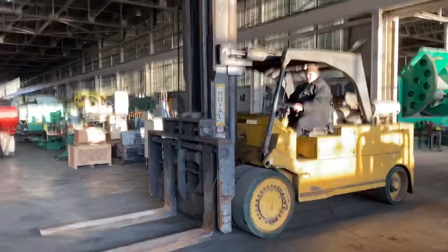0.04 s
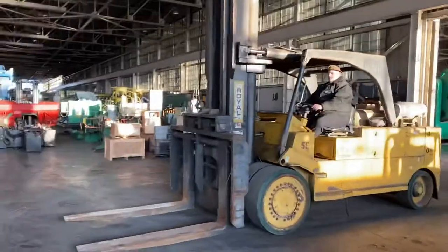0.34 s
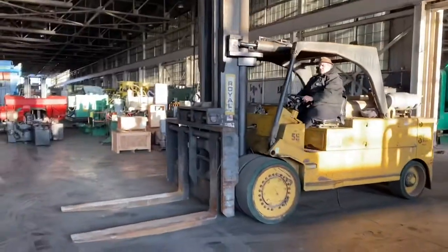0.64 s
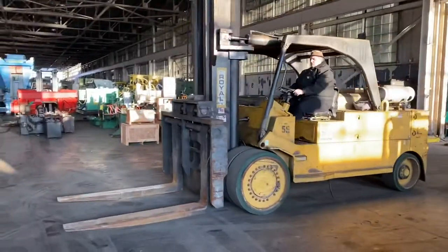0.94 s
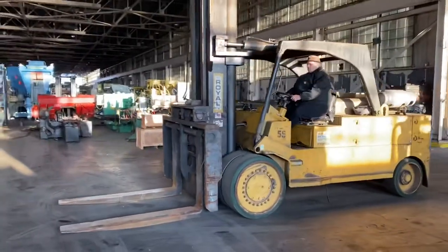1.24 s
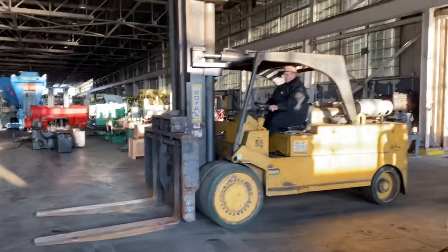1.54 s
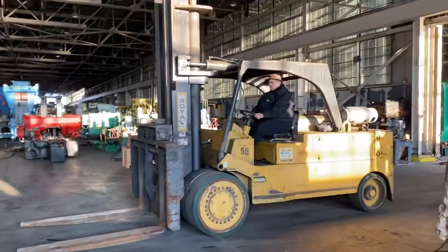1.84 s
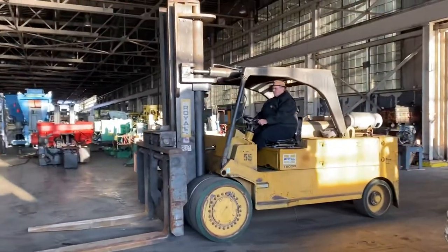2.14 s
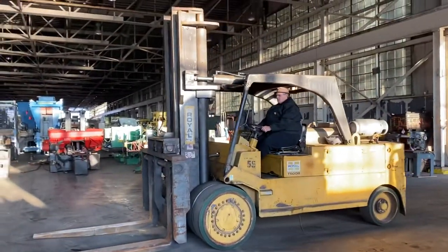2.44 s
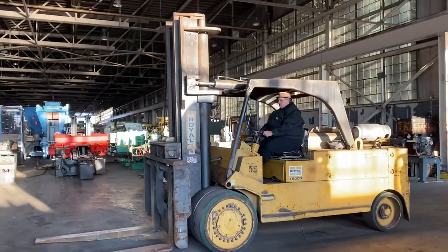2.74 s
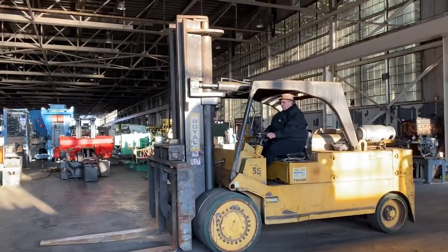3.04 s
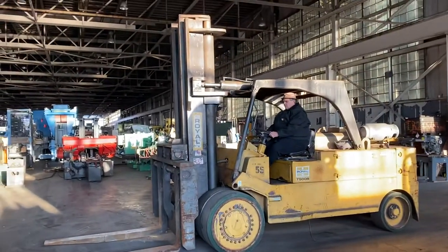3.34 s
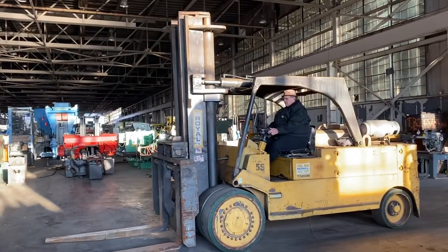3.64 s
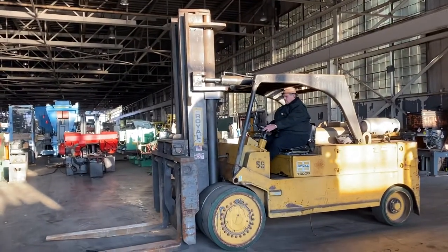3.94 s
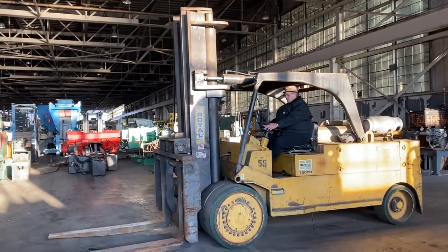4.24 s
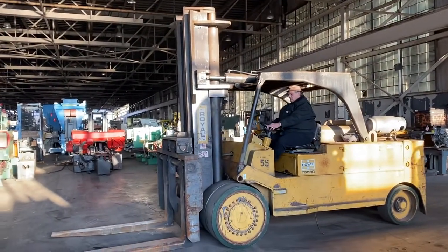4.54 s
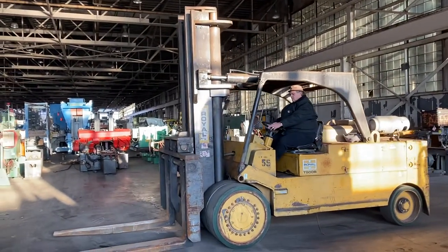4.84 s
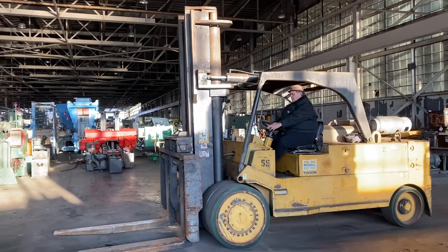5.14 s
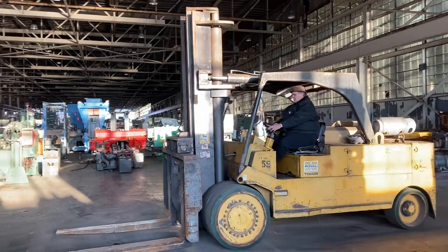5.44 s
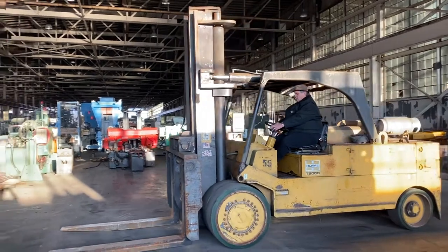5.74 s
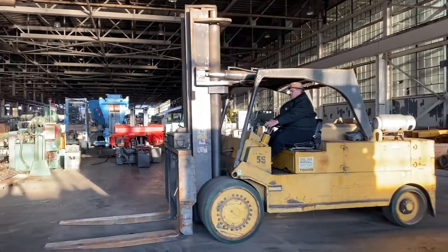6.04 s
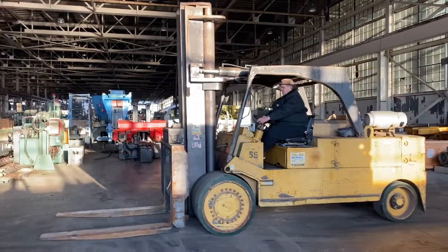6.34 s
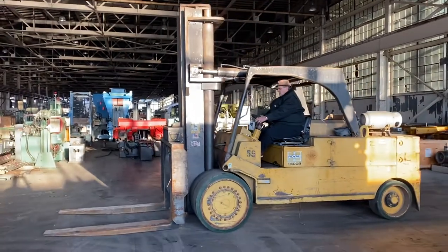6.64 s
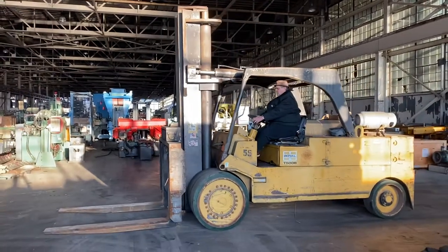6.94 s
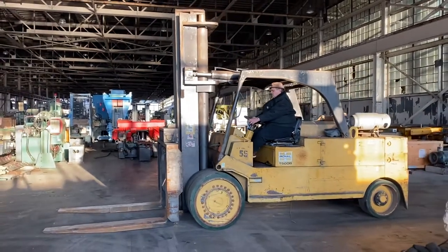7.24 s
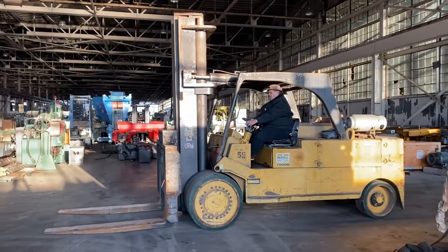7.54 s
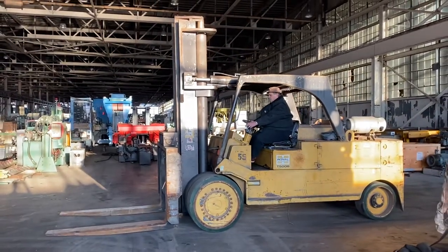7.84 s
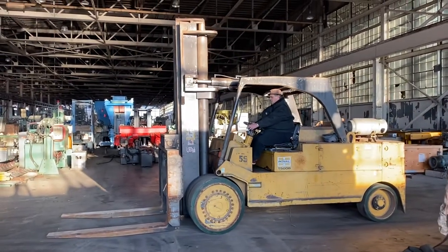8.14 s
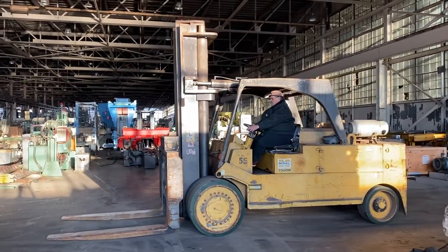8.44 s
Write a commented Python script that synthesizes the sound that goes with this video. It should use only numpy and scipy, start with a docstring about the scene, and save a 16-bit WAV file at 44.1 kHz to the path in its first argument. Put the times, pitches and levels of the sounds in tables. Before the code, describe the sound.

Heard from close by in a large, reverberant warehouse, a heavy forklift revs three times and drops to an uneven idle in between. Gears whine in spurts, tyres scrub on concrete, and a leaky exhaust sputters under load while oil hisses through a valve. After the second rev, the brakes rub and the steel mast clanks sharply, shaking its chains, before the last rev builds. Distant machines hum underneath.

```python
"""A big V8 forklift works in a steel warehouse, revving with three presses of the pedal and idling between.
Lumpy firings boom in the exhaust and spit through a leak under load; the fan rushes and the gears whine.
The tyres scrub in the turns and oil hisses through a valve. As the brakes slow the truck, the mast (its
lifting frame) clanks and the chains ring. The hall echoes, and other machinery hums far off."""
import sys
import numpy as np
from scipy import signal
from scipy.fft import rfft, irfft
from scipy.io import wavfile
from scipy.ndimage import uniform_filter1d

SR = 44100
rng = np.random.default_rng(int(sys.argv[2]) if len(sys.argv) > 2 else 0)


def wav_record(signal):
    """Record a signal, one row per channel, as 16-bit PCM in the file named by sys.argv[1]."""
    frames = np.transpose(np.atleast_2d(signal))
    bounded = np.clip(frames, -1, 1)
    # unit amplitude maps onto the largest positive 16-bit level
    quanta = np.round(bounded * 32767).astype(np.int16)
    wavfile.write(sys.argv[1], SR, quanta)


N = 382788
T = np.arange(N) / SR
FREQS = np.arange(N + 1) * SR / (2 * N)
IDLE_HZ, FULL_HZ = 7.7, 30  # engine cycles per second; all eight cylinders fire once a cycle

# The uneven firings at the tailpipe. Each entry: one cylinder's strength in dB.
FIRING_DB = [1, -4, 4, -4, 3.5, 3.5, -9, 4]
# Puffs through the exhaust leak. Each entry: one cylinder's strength in dB.
LEAK_DB = [12, 9, -41, 14.5, -1, 6, 8.5, -55]
# Gearbox resonances (pitches it boosts). Each row: pitch in Hz, width in Hz, boost in dB.
GEARBOX = [(385, 70, 6), (460, 110, 9.5), (790, 90, 4), (1335, 60, 10), (1465, 110, 10.5)]
# Knocks of the mast. Each row: start in seconds, relative level in dB, decay in seconds,
# extra ringing in dB, chain shake from 0 to 1, crack level in dB, top of the crack in Hz.
KNOCKS = [(6.450, -14.5, 0.011, -26, 0.3, -29, 5000), (6.472, -17.5, 0.023, -22, .1, -34, 4000),
          (6.531, -21, .014, -16, 0, -38, 3000), (6.562, -11.5, 0.015, 0, 0.2, -20, 2310),
          (6.578, -14.5, 0.031, 9, 1, -27.5, 11000), (6.67, -17.5, 0.022, -14, 0, -40, 4000),
          (6.726, -15.5, 0.021, -7, 0.2, -27.5, 3570), (6.75, -20, 0.038, -8, 0.1, -38, 3000),
          (6.83, -25.5, 0.038, -11, 0, -46, 3000)]


def undb(db):
    """Turn decibels into a gain to multiply by."""
    return 10 ** (np.asarray(db) / 20)


def unit(x):
    """Scale a signal to an average (rms) level of 1."""
    return x / np.sqrt(np.mean(x ** 2))


def even(x, span_s=0.99):
    """Hold the average level near 1; single firings keep their shape."""
    size = int(span_s * SR / 2)
    return x / np.sqrt(uniform_filter1d(uniform_filter1d(x ** 2, size), size) + 1e-18)


def slope(points, hz):
    """Read between rows of (Hz, value), with octaves evenly spaced."""
    point_hz, value = np.transpose(points)
    return np.interp(np.log(hz + 1), np.log(point_hz), value)


def bumps(resonances, hz):
    """The boost in dB that resonances give at a frequency."""
    return sum(db / (1 + (2 * (hz - centre) / width) ** 2) for centre, width, db in resonances)


def colour(x, points, resonances=()):
    """Filter a sound with a broad tone curve and resonances on top."""
    cepstrum = irfft(np.log(undb(slope(points, FREQS) + bumps(resonances, FREQS))))
    cepstrum[1:N] *= 2  # folded so that ringing comes after a pulse, never before
    cepstrum[N + 1:] = 0
    return irfft(rfft(x, 2 * N) * np.exp(rfft(cepstrum)))[:N]


def walk(rate_hz):
    """A smooth random wander of size about 1."""
    size = int(SR / rate_hz)
    steps = np.repeat(rng.standard_normal(N // size + 1), size)
    return unit(uniform_filter1d(steps, size)[:N])


def tone(hz, wobble, flicker_db):
    """A tone whose pitch and level waver."""
    level = np.sqrt(2) * undb(flicker_db * walk(9.1))
    turns = np.cumsum(hz * np.ones(N)) / SR + wobble * walk(25)
    return level * np.sin(2 * np.pi * turns)


def swell(start, end, attack_s, release_s):
    """A level that rises towards 1 from start and dies away after end."""
    rise = 1 - np.exp(-np.clip(T - start, 0, end - start) / attack_s)
    return rise * np.exp(-np.maximum(T - end, 0) / release_s)


def strike(start, rise_s, decay_s):
    """The level of a blow: a quick rise, then a fade."""
    age = np.maximum(T - start, 0)
    return (1 - np.exp(-age / rise_s)) * np.exp(-age / decay_s)


def pedal(lag_s=.06, wind_up_s=1.404, coast_s=.816, coast_hz=5.07):
    """The pedal fills the cylinders (charge, 0 to 1); the heavy flywheel's speed follows slowly."""
    # Each row: pedal down in seconds, pedal up in seconds, speed aimed at in cycles per second.
    presses = [(-1.255, 1.283, 30.22), (3.931, 6.064, 23.24), (7.766, 9, 29.56)]
    speed, charge = np.full(N, IDLE_HZ), 0
    for down, up, goal_hz in presses:
        wound = IDLE_HZ + (goal_hz - IDLE_HZ) * swell(down + lag_s, up + lag_s, wind_up_s, np.inf)
        coasting = np.exp(-np.maximum(T - up - lag_s, 0) / coast_s)
        speed = np.maximum(speed, coast_hz + (wound - coast_hz) * coasting)
        depth = (goal_hz - IDLE_HZ) / (FULL_HZ - IDLE_HZ)
        charge += depth * swell(down, up, attack_s=.3, release_s=.04)
    return speed, charge


def gas_flow(speed, charge, burnt_db=-33.5, pumped_db=-48.5, db_per_octave=8):
    """Exhaust flow in dB: burnt fuel plus the air that the pistons pump."""
    pumped = undb(pumped_db + db_per_octave * np.log2(speed / FULL_HZ))
    return 20 * np.log10(undb(burnt_db) * charge + pumped)


def firings(cycles, pattern_db, scatter_db, jitter, ceiling=1.1):
    """Eight pulses a cycle, each a little off in time and strength."""
    slot = np.arange(int(cycles[-1] * 8))
    late, strong = rng.standard_normal((len(slot), 2)).T
    at = np.interp((slot + jitter * late) / 8, cycles, np.arange(N)).astype(int)
    size = undb(np.array(pattern_db)[slot % 8] + scatter_db * np.minimum(strong, ceiling))
    return np.bincount(at, size, N)


def puffs(pulses, decay_s, steady, rise_s=0.01):
    """Noise that flares at each pulse over a steady flow."""
    flare = signal.lfilter([1], [1, -np.exp(-1 / (decay_s * SR))], pulses)
    return (unit(uniform_filter1d(flare, int(rise_s * SR) + 1)) + steady) * rng.standard_normal(N)


def exhaust(speed, cycles, flow_db, pull):
    """A clean note and ragged firings boom in the pipe; with less gas it is thinner and rougher."""
    # The V8's note. Each row: multiple of the engine speed, relative level in dB.
    partials = [(2, -13), (3, -4), (4, -7), (5, 8), (7, -7), (8, -20), (10, -7)]
    # The exhaust's tone curve. Each row: frequency in Hz, gain in dB.
    curve = [(20, -72.5), (32, -27), (45, -0.5), (65, 0), (110, -0.5), (160, -9), (260, -15), (500, -14.5),
             (1000, -40.5), (3000, -74)]
    # Pipe resonances. Each row: pitch in Hz, width in Hz, boost in dB.
    pipe = [(45, 12, 0), (72.7, 25.6, 9.5), (129.7, 7.2, 3.5), (195.9, 18, 10.5)]
    # Strength of the boom. Each row: cycles per second, gain in dB coasting, gain in dB pulling.
    boom_by_speed = [(7.55, -33, -17), (10.8, -29, -15), (14.7, -20, -15), (18.6, -15.5, -15.5),
                     (25.04, -17, -12.5), (26, -30, -17.5)]
    # The boom slowly swells and dips. Each row: time in seconds, gain in dB.
    boom_by_time = [(.8, -1.5), (1.2, -3), (2.6, 1), (3.6, -1.5), (4.8, 0.7), (6.1, 0.5), (6.7, -5.5),
                    (7.7, 0)]
    load_db = flow_db + 38
    note = 0
    for multiple, db in partials:
        lope_db = 0.26 * load_db * (multiple < 4)  # the deep throb grows with load
        level = undb(db + lope_db + 2.6 * walk(4.3))
        note += level * np.sin(2 * np.pi * (multiple * cycles + rng.random()))
    pulses = firings(cycles, FIRING_DB, scatter_db=7, jitter=0.1457)
    note, ragged = (even(colour(x, curve, pipe)) for x in (note, pulses))
    ragged_share = undb(-5 - 0.36 * load_db) * np.sqrt(18 / speed) ** (1 - pull / 2)
    hz, coasting_db, pulling_db = np.transpose(boom_by_speed)
    boom_db = (1 - pull) * np.interp(speed, hz, coasting_db) + pull * np.interp(speed, hz, pulling_db)
    boom_db += np.interp(T, *np.transpose(boom_by_time))
    return even(note + ragged_share * ragged) * undb(boom_db)


def chug(speed, cycles, pull, depth_db=3.5):
    """A gain that heaves once a cycle while the engine labours at low revs."""
    labour = pull * np.interp(speed, [10, 15], [1, 0])
    return undb(depth_db * labour * (np.sin(2 * np.pi * cycles) + .5 * walk(12) - .4))


def body_panels(speed, pull, panel_hz=207):
    """The body panels hum, and boom when the firing rate passes through their resonance."""
    firing_hz = speed * 8
    resonance_db = bumps([(panel_hz, 45, 13), (panel_hz, 4, 11)], firing_hz)  # broad skirt, sharp peak
    db = -37.5 + 8 * np.log2(speed / FULL_HZ) - 5 * (1 - pull) + resonance_db
    return undb(db) * tone(firing_hz, wobble=0.02, flicker_db=1)


def fan_and_block(speed, cycles, pull, coasting_db=-6, nearer_db_per_s=0.332):
    """The fan rushes, valves clatter and whines flare at resonances, louder as the truck nears."""
    # The rush's tone curve. Each row: frequency in Hz, gain in dB.
    curve = [(40, -61.5), (100, 10), (200, 3.5), (350, 2), (600, -3.5), (1000, -5), (1600, -12.5),
             (2300, -17.5), (3500, -23.5), (6000, -30), (10000, -42), (15000, -117)]
    # Resonances of engine cover and fan housing. Each row: pitch in Hz, width in Hz, boost in dB.
    cover = [(370, 73, 2.5), (465, 26, 3.5), (794, 58, 6), (1270, 86, 1), (1594, 220, 3.5)]
    housing = [(305, 35, 9.5), (345, 25, 6)]
    # Whines of block and fan. Each row: multiple of the engine speed, relative level in dB.
    whines = [(10, -21), (16, -16), (20, -22), (40, -24.5)]
    pulses = firings(cycles, FIRING_DB, scatter_db=8, jitter=0.024)
    rush = even(colour(puffs(pulses, decay_s=0.0047, steady=11), curve, cover))
    whine = 0
    for multiple, db in whines:
        hz = multiple * speed
        whine += undb(db + bumps(cover + housing, hz)) * tone(hz, wobble=0.05, flicker_db=2)
    whine *= speed / 26 * undb(coasting_db * (1 - pull))
    return (rush + whine) * undb(-16.5 + 11.5 * np.log2(speed / FULL_HZ) + nearer_db_per_s * T)


def leak(cycles, flow_db):
    """Gas sputters out of the manifold, the pipes that collect the exhaust."""
    # The leak's tone curve. Each row: frequency in Hz, gain in dB.
    curve = [(500, -22.5), (1800, 9.5), (3200, 2), (4100, 0.5), (4800, -6.5), (5500, -1), (6200, -5.5),
             (7200, 0), (10000, 1), (13000, -1.5), (15500, -3)]
    # Manifold resonances. Each row: pitch in Hz, width in Hz, boost in dB.
    manifold = [(4800, 200, 6.5), (6200, 270, 7)]
    pulses = firings(cycles, LEAK_DB, scatter_db=3.5, jitter=0.063, ceiling=.3)
    gas = puffs(pulses, decay_s=0.008, steady=.55, rise_s=.002)
    return even(colour(gas, curve, manifold)) * undb(flow_db)


def loose_part(speed, cycles, flow_db):
    """A loose part ticks as the engine shakes it, most at low revs under load."""
    # The ticks' tone curve. Each row: frequency in Hz, gain in dB.
    curve = [(800, -51), (3500, 12), (8000, 26), (15000, -11)]
    # The part's resonances. Each row: pitch in Hz, width in Hz, boost in dB.
    resonances = [(4640, 590, 15), (6240, 660, 4), (10200, 1100, 12), (13500, 1500, 7)]
    pulses = firings(cycles, LEAK_DB, scatter_db=8, jitter=0.33, ceiling=0)
    ticks = puffs(pulses, decay_s=0.0029, steady=0, rise_s=.002)
    shake_db = flow_db - 11 - 15 * np.log10(np.maximum(speed / 12, 1))
    return even(colour(ticks, curve, resonances), span_s=1) * undb(shake_db)


def gears(speed, cycles, grip_s=.5, swell_depth=.35):
    """Gear teeth whine and chatter; their pitch trails the engine until the fluid drive grips."""
    # Spells of gear whine, while pulling, coasting or idling. Each row: start and end in seconds, teeth
    # meeting per cycle, starting slip from 0 to 1, chatter depth, relative dB of the four partials.
    whine_spells = [(-.1, .13, 23.1, 0, .4, -26.5, -42, -46, -52),
                    (.13, 1.38, 28.7, .13, .25, -42, -42, -39, -38),
                    (1.42, 1.78, 42, .33, .4, -44, -50, -41.5, -52),
                    (1.82, 2.1, 31, 0, 1.1, -41, -52, -52, -54),
                    (2.25, 2.55, 41.5, .1, .9, -44, -46, -60, -66),
                    (2.85, 4.1, 52, 0, .9, -51.5, -69, -69, -74),
                    (4.3, 4.87, 33.3, 0, 1.1, -40.5, -55, -56, -58),
                    (5.1, 5.95, 25.6, .14, .7, -33, -36, -40, -53),
                    (6.15, 6.33, 27.5, 0, .8, -38.5, -52, -52, -56),
                    (8.1, 8.33, 34, 0, .5, -39, -54, -58, -66),
                    (8.4, 8.55, 30.1, 0, .5, -36, -52, -56, -66)]
    # The tones in the whine. Each entry: a multiple of the rate at which teeth meet.
    partials = [1, 1.7, 2, 3]
    # The whine comes in spurts. Each row: time in seconds, boost in dB.
    spurts = [(.06, 2), (.32, 3), (.48, 2), (.665, 6), (.78, 2), (.87, 4), (1.06, 2), (1.16, 5), (1.37, 3),
              (1.44, 4), (1.87, 4), (1.99, 3), (4.76, 4), (5.24, 3), (5.33, 5), (5.67, 2), (5.75, 3),
              (5.83, 5.5), (5.89, 3), (8.32, 4)]
    out = 0
    for start, end, ratio, slip, chatter, *levels_db in whine_spells:
        tooth_hz = speed * ratio * (1 - slip * np.exp(-np.maximum(T - start, 0) / grip_s))
        whine = 0
        for multiple, db in zip(partials, levels_db):
            hz = multiple * tooth_hz
            whine += undb(db + bumps(GEARBOX, hz)) * tone(hz, wobble=.06 * multiple, flicker_db=1.2)
        rough = unit(1 + chatter * walk(60) + swell_depth * np.sin(2 * np.pi * cycles))
        out += whine * rough * swell(start, end, attack_s=.03, release_s=.25)
    spurt_db = sum(db * np.exp(-((T - at) / .03) ** 2) for at, db in spurts)
    return out * undb(spurt_db - 1)


def tyres(grip_s=0.067, release_s=0.24, judder=0.4):
    """The solid tyres judder and growl over the concrete in the turns."""
    # Each row: start of a turn in seconds, end in seconds, level in dB.
    turns = [(-.3, 0.197, -24.5), (1.95, 2.64, -35.5)]
    # The scrub's tone curve. Each row: frequency in Hz, gain in dB.
    curve = [(120, -35), (260, 3), (400, -1.5), (600, -2), (1000, -12), (2500, -21), (6000, -45.5)]
    scrub = unit(colour(rng.standard_normal(N) * (1 + judder * walk(45)), curve))
    return scrub * sum(undb(db) * swell(start, end, grip_s, release_s) for start, end, db in turns)


def machinery(gain_db=-2):
    """Machines at the far end of the hall give a wavering hum."""
    # Each row: pitch in Hz, relative level in dB.
    hums = [(75.4, -36), (118.4, -37.5), (199.2, -45), (441.4, -46)]
    return sum(undb(db + gain_db) * tone(hz, wobble=0.22, flicker_db=3.5) for hz, db in hums)


def slack_teeth(speed, pull, full_db=-28, db_per_octave=20):
    """With no load, the gear teeth rattle in their gaps and make the gearbox ring."""
    # The rattle's tone curve. Each row: frequency in Hz, gain in dB.
    curve = [(700, -38), (1200, -11.5), (1450, -2), (1700, -16), (2600, -38)]
    rattle = unit(colour(rng.standard_normal(N) * (1 + .5 * walk(20)), curve, GEARBOX))
    return rattle * (1 - pull) * undb(full_db + db_per_octave * np.log2(speed / FULL_HZ))


def oil_valve(fade_s=0.17):
    """Oil hisses and whistles through a hydraulic valve."""
    # Each row: opening and shutting time in seconds, relative level in dB, whistle from 0 to 1.
    openings = [(3.395, 4.25, -50.5, 0.55), (7.551, 8.0, -41.5, 0.1), (8.145, 8.8, -37, 0)]
    # The hiss's tone curve. Each row: frequency in Hz, gain in dB.
    curve = [(1500, -1), (3400, 2), (4200, 1.5), (6000, 0), (9000, -1), (15000, -8)]
    # Each row: pitch of a whistle in Hz, width in Hz, full boost in dB.
    whistles = [(3780, 120, 11), (4100, 220, 23), (4830, 60, 24)]
    out = 0
    for opens, shuts, db, share in openings:
        resonances = [(hz, width, share * boost_db) for hz, width, boost_db in whistles]
        hiss = unit(colour(rng.standard_normal(N), curve, resonances))
        out += undb(db) * hiss * swell(opens, shuts, fade_s, fade_s)
    return out


def spits():
    """Single hard firings blow through the leak and jolt the loose part into a chirp."""
    # Each row: start in seconds, relative levels of the spit and of the chirp in dB.
    hard_firings = [(3.996, -42, -52), (4.084, -41, -45), (4.156, -33, -44), (4.199, -36, -45),
                    (4.221, -36, -46), (4.261, -38, -47), (4.317, -30.5, -42), (4.351, -32, -43),
                    (4.405, -42, -42), (4.454, -36, -40), (4.484, -34, -44), (4.499, -36, -48),
                    (4.580, -30, -52), (4.697, -33, -36), (4.810, -34, -40), (4.879, -36, -43),
                    (4.996, -30, -43), (5.096, -32, -41), (5.126, -32, -46), (5.191, -31, -48),
                    (5.285, -31, -41), (5.488, -34, -46), (5.557, -39, -48), (5.578, -34, -45),
                    (7.724, -39, -52), (7.815, -37, -46), (7.867, -30.5, -41), (7.935, -42, -38),
                    (7.995, -35, -44), (8.031, -34, -38), (8.047, -33, -38), (8.084, -35, -32.5),
                    (8.133, -33, -44), (8.166, -33, -43), (8.256, -29, -37), (8.369, -30, -36),
                    (8.431, -30, -32), (8.470, -27, -33), (8.566, -33, -33), (8.658, -27, -34)]
    # The chirp's tones. Each row: pitch in Hz, relative level in dB, seconds to fade by 60 dB.
    chirp_tones = [(4680, -1, .08), (5010, 0, .08), (6200, -4, .06)]
    # The spit's tone curve. Each row: frequency in Hz, gain in dB.
    curve = [(1500, -3), (4000, 8), (6200, 11), (8000, 1), (10000, 14.5), (15000, -7)]
    gas, chirps = np.zeros(2 * N), np.zeros(2 * N)
    age = T[:SR // 10]
    flare = strike(0, rise_s=.0013, decay_s=.01)[:len(age)]
    for start, spit_db, jolt_db in hard_firings:
        span = slice(int(start * SR), int(start * SR) + len(age))
        gas[span] += undb(spit_db) * flare
        for hz, db, ring_s in chirp_tones:
            pitch = hz * rng.uniform(.975, 1.025)
            chirps[span] += undb(jolt_db + db - 60 * age / ring_s) * np.sin(2 * np.pi * pitch * age)
    return gas[:N] * unit(colour(rng.standard_normal(N), curve)) + chirps[:N]


def brakes(start_s=5.92, end_s=6.84, level_db=-23.5):
    """The brakes rub and the tyres scrub: a low rush with a thin hiss on top."""
    # The rubbing's tone curve. Each row: frequency in Hz, gain in dB.
    curve = [(60, -16), (130, 10.5), (330, 11), (600, -1), (1400, -8.5), (2200, -19.5), (4000, -29),
             (7000, -33), (10000, -29), (15000, -47)]
    rub = unit(colour(rng.standard_normal(N), curve))
    return rub * undb(level_db) * swell(start_s, end_s, attack_s=.078, release_s=.73)


def mast(rattle_db=6.5, ring_db=-22, rise_s=.001):
    """Each knock is a short rattle of heavy steel that leaves the mast and forks ringing."""
    # The steel's tones. Each row: pitch in Hz, relative level in dB, seconds to fade by 60 dB.
    steel_tones = [(176, -1, 0.49), (216, 8, 1), (389, 0.5, 0.99), (807, 9, .13), (941, 13.5, 0.092),
                   (1065, 12, 0.14), (1290, 0.5, 0.27), (1640, -3, 0.74)]
    # The rattle's tone curve. Each row: frequency in Hz, gain in dB.
    curve = [(50, -42), (130, 7), (210, 13), (330, 8), (600, 0.5), (1050, -6), (1650, -8), (2100, -22),
             (3600, -25.5), (6000, -40), (11000, -40), (15000, -52)]
    rattle, ring = np.zeros(N), np.zeros(N)
    for start, db, decay_s, steel_db, *_ in KNOCKS:
        at = int(start * SR)
        age = T[:N - at]
        rattle[at:] += undb(db) * strike(0, rise_s, decay_s)[:N - at] * rng.standard_normal(N - at)
        for hz, tone_db, ring_s in steel_tones:
            level = undb(db + steel_db + tone_db - 60 * age / ring_s)
            ring[at:] += level * np.sin(2 * np.pi * (hz * age + rng.random()))
    return unit(colour(rattle, curve)) * np.std(rattle) * undb(rattle_db) + undb(ring_db) * ring


def cracks(low_hz=900):
    """Steel meets steel with a short crack; hard hits tend to be brighter."""
    out = 0
    for start, *_, db, top_hz in KNOCKS:
        band = signal.butter(4, [low_hz, top_hz], "bandpass", fs=SR, output="sos")
        noise = unit(signal.sosfilt(band, rng.standard_normal(N)))
        out += undb(db) * strike(start, rise_s=.0005, decay_s=.009) * noise
    return out


def chains(links=4, pitch_spread=.002):
    """Knocks shake the lift chains; links of nearly the same pitch shimmer as they ring out."""
    # Each row: pitch in Hz, level at its loudest in dB, seconds to fade by 60 dB.
    chain_tones = [(5790, -57, 1.6), (6815, -61, 2.2), (7050, -52, .7), (9680, -55, 2.5), (9930, -50, 1),
                   (10150, -59, 1.8), (11200, -50, .65)]
    out = 0
    for hz, db, ring_s in chain_tones:
        decay_s = ring_s / np.log(1000)
        energy = sum((shake * swell(start, start + .005, .001, decay_s)) ** 2
                     for start, _, _, _, shake, *_ in KNOCKS)
        pitches = hz * (1 + pitch_spread * (np.linspace(-1, 1, links) + rng.uniform(-.3, .3, links)))
        shimmer = sum(np.sin(2 * np.pi * (pitch * T + rng.random())) for pitch in pitches)
        out += undb(db) * np.sqrt(energy / energy.max()) * unit(shimmer)
    return out


def clinks(rise_s=.012):
    """Swinging links meet just after the hard knocks and ring brightly."""
    # Each row: start in seconds, pitch in Hz, relative level in dB, seconds to fade by 60 dB.
    hits = [(6.592, 7050, -27, .1), (6.622, 9930, -35, .17), (6.678, 5790, -41, .18),
            (6.736, 9930, -32, .18), (6.828, 5790, -42, .18)]
    return sum(undb(db) * strike(start, rise_s, ring_s / np.log(1000)) * np.sin(2 * np.pi * hz * T)
               for start, hz, db, ring_s in hits)


def hall_tail():
    """The echo at one spot: different left and right, shorter and weaker in the high treble."""
    # Each row: frequency in Hz, seconds to fade by 60 dB, echo level in dB.
    echo_bands = [(60.4, 1.5, -35), (131, 1.3, -8.5), (282, 1.9, -11.5), (545, 3.1, 0), (1550, 2.25, -2.5),
                  (4040, 0.97, 1), (7920, 0.67, -2.5), (9200, 0.17, -13), (15000, .3, -49)]
    rows = np.array(echo_bands)
    hz, age, noise = signal.stft(rng.standard_normal((2, 2 * SR)), SR, nperseg=512)
    ring_s = slope(rows[:, :2], hz)[:, None]
    echo_db = slope(rows[:, ::2], hz)[:, None]
    fade = np.exp(-np.log(1000) * age / ring_s) * np.sqrt(2 * np.log(1000) / (ring_s * SR))
    return signal.istft(noise * fade * undb(echo_db) * (age > .008), SR)[1]


def hall(x, spots=5):
    """Direct sound plus echoes that change from spot to spot as the truck moves."""
    running = np.pad(x, (SR, 0), mode="reflect")  # the hall is already ringing at the start
    place = np.linspace(0, spots - 1, N)
    out = x
    for spot in range(spots):
        share = np.cos(np.pi / 2 * np.minimum(abs(place - spot), 1))
        out = out + share * signal.fftconvolve(running[None], hall_tail(), axes=1)[:, SR:SR + N]
    return out


def scene(hiss_db=0.5, gear_hall_share=.6):
    """The pedal drives the engine, its parts follow its speed, and everything sounds in the hall."""
    speed, charge = pedal()
    cycles = np.cumsum(speed) / SR
    flow_db = gas_flow(speed, charge)
    pull = np.minimum(charge / .3, 1)  # 0 coasting, 1 pulling
    boom = exhaust(speed, cycles, flow_db, pull) * chug(speed, cycles, pull)
    engine = boom + body_panels(speed, pull) + fan_and_block(speed, cycles, pull)
    engine += slack_teeth(speed, pull)
    hiss = leak(cycles, flow_db) + spits() + loose_part(speed, cycles, flow_db) + oil_valve()
    whine = gears(speed, cycles)
    truck = engine + hiss * undb(hiss_db) + gear_hall_share * whine + tyres() + brakes()
    clanks = mast() + cracks() + chains() + clinks()
    return hall(truck + clanks + machinery()) + (1 - gear_hall_share) * whine


def record(dry, peak_limit=.93, top_hz=15400):
    """The left side is a little brighter and lags in the treble; peaks are rounded and the top is cut."""
    # How far the left side lags the right. Each row: frequency in Hz, lag in whole waves.
    left_lag = [(0, 0), (6300, 0), (8450, .5), (9700, .96), (10500, 1.03), (12000, 1.5), (13600, 1.97),
                (14500, 2.03), (15700, 2.5)]
    lag = np.exp(-2j * np.pi * np.interp(FREQS, *np.transpose(left_lag)))
    lean_db = bumps([(60, 2300, -0.59), (3080, 2500, 1.66)], FREQS)
    sides = np.array([lag * undb(lean_db), undb(-lean_db)])
    stereo = irfft(rfft(dry, 2 * N) * sides)[:, :N]
    rounded = stereo / (1 + (stereo / peak_limit) ** 8) ** (1 / 8)
    return signal.sosfilt(signal.ellip(10, .2, 80, top_hz, fs=SR, output="sos"), rounded)


dry = scene()
out = record(dry)
wav_record(out)
```